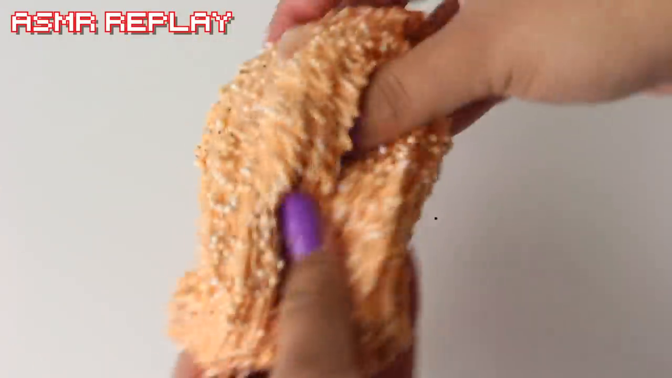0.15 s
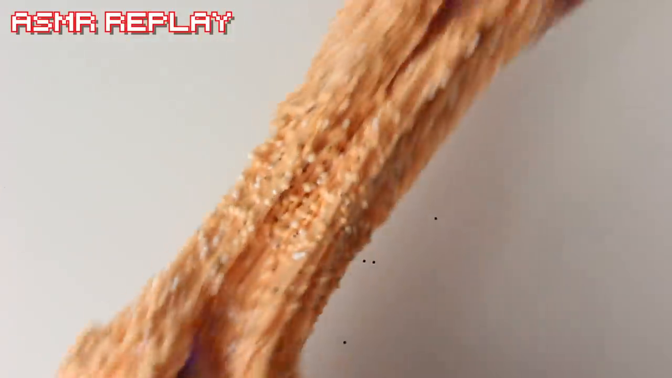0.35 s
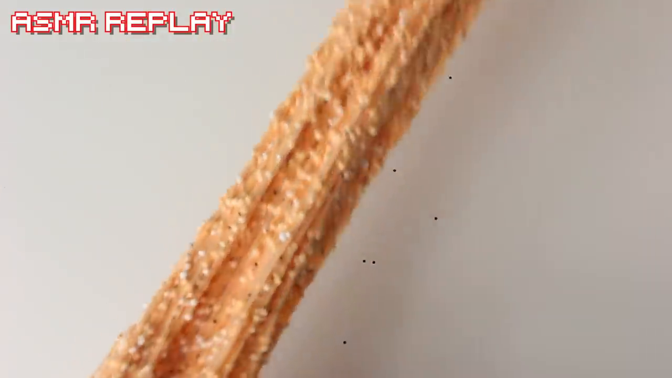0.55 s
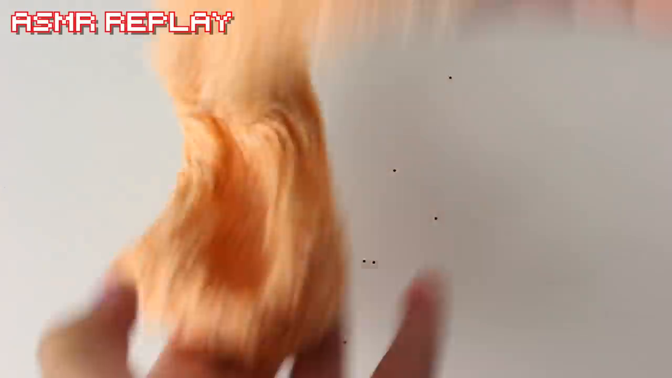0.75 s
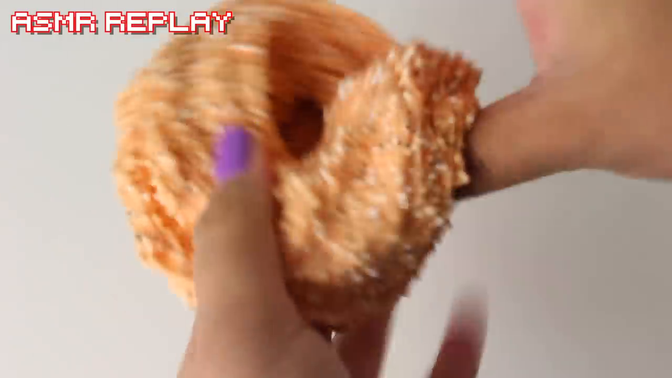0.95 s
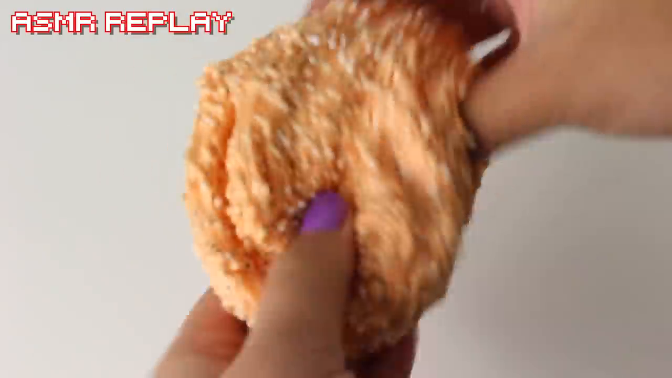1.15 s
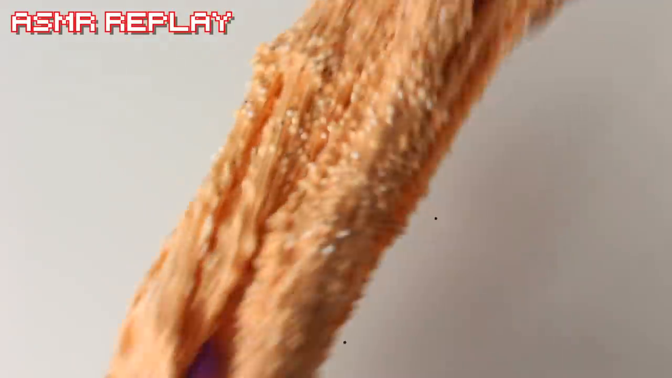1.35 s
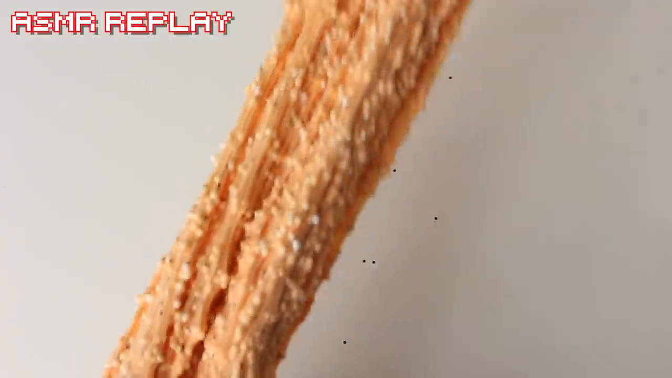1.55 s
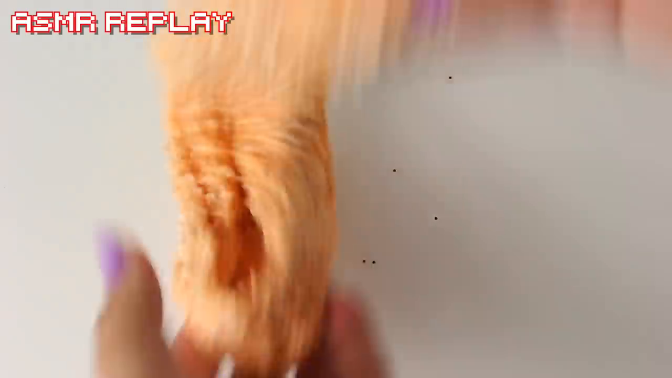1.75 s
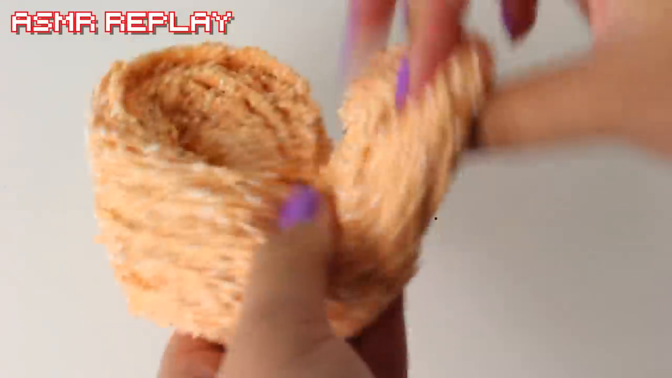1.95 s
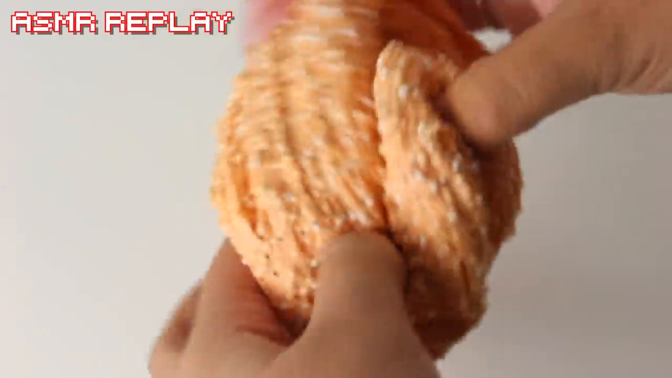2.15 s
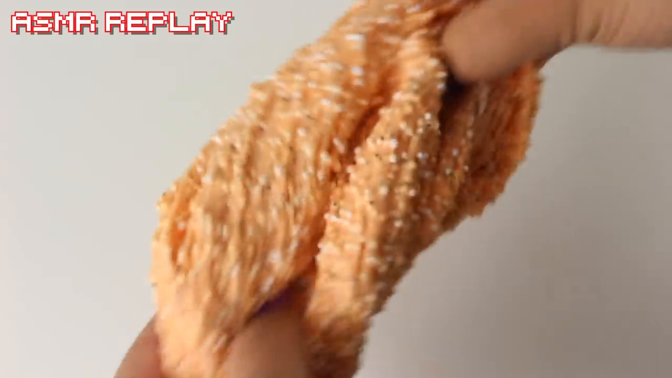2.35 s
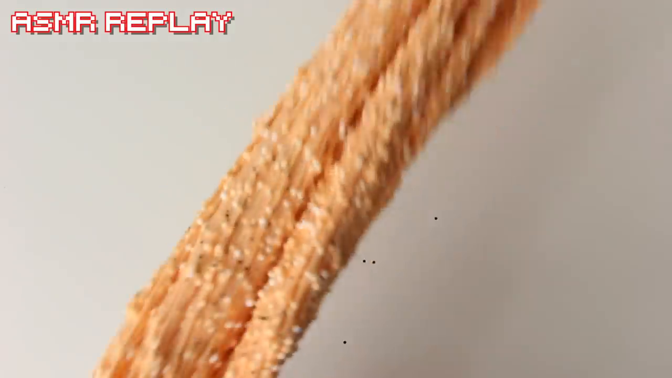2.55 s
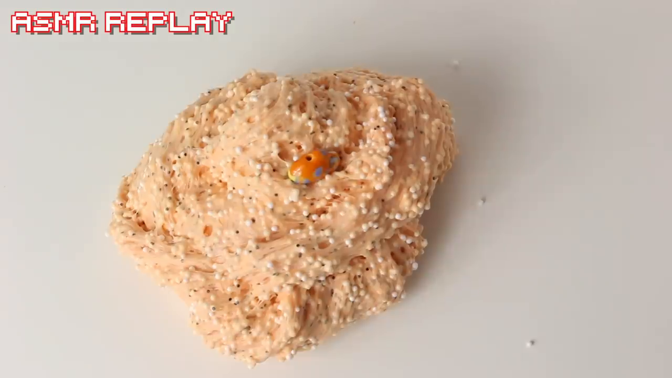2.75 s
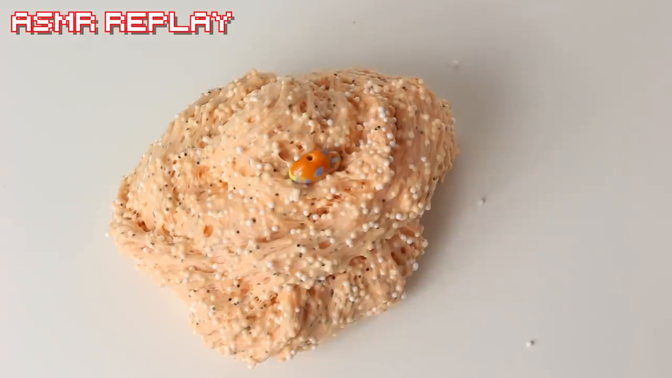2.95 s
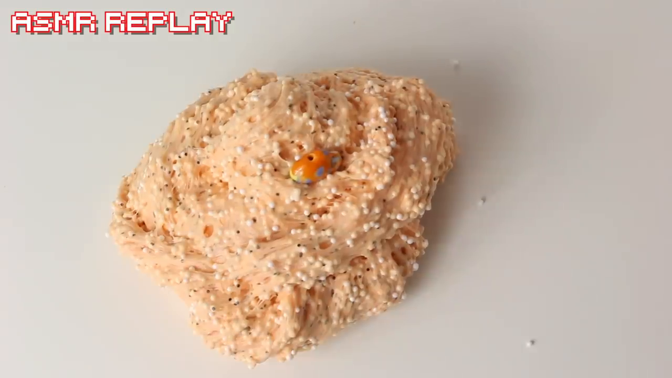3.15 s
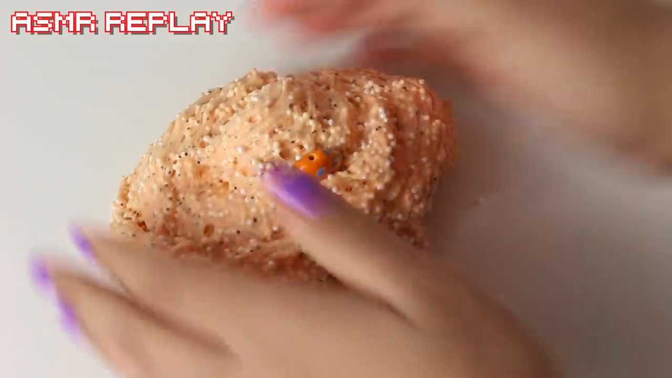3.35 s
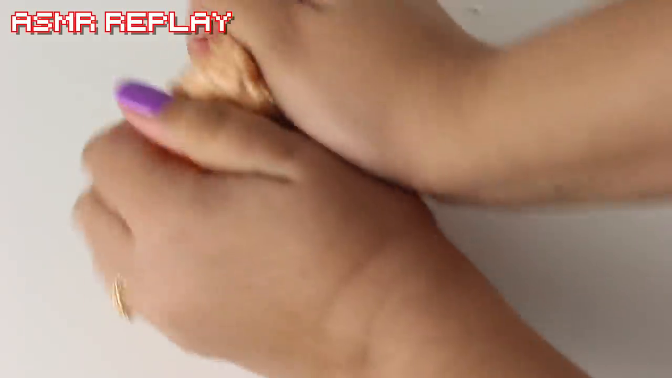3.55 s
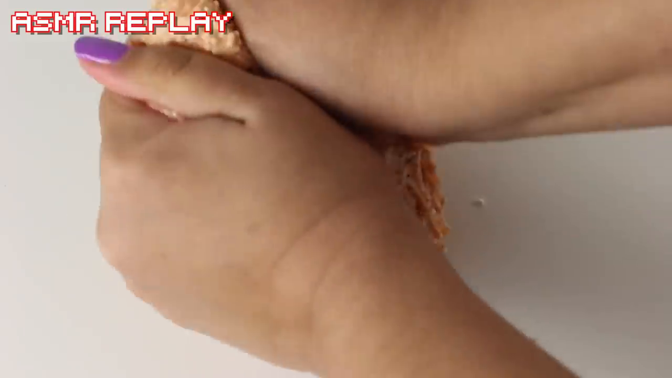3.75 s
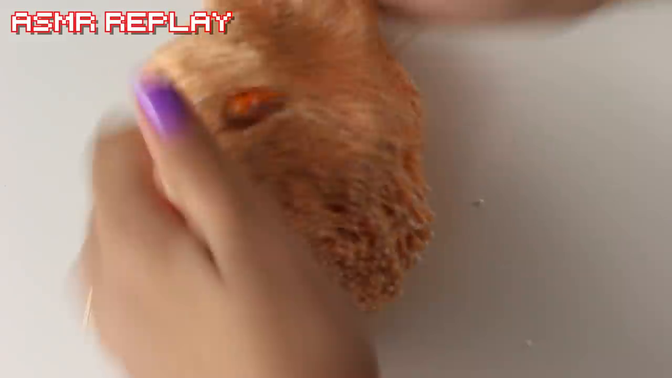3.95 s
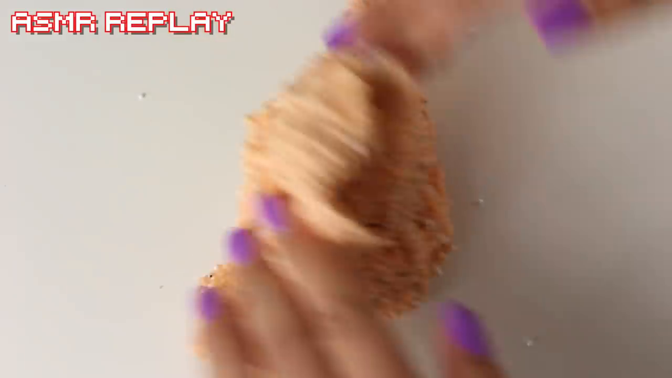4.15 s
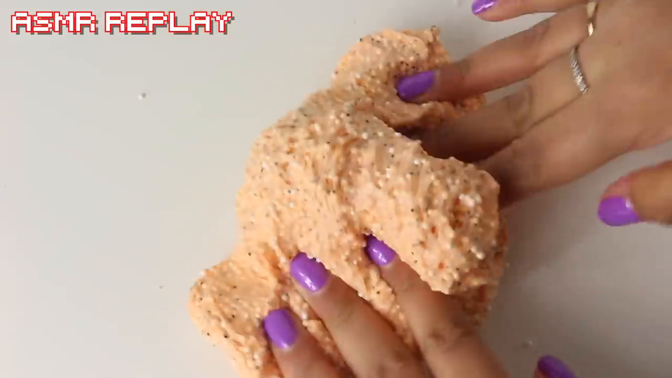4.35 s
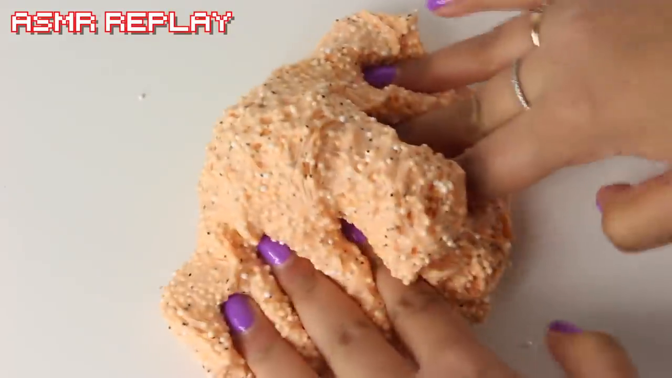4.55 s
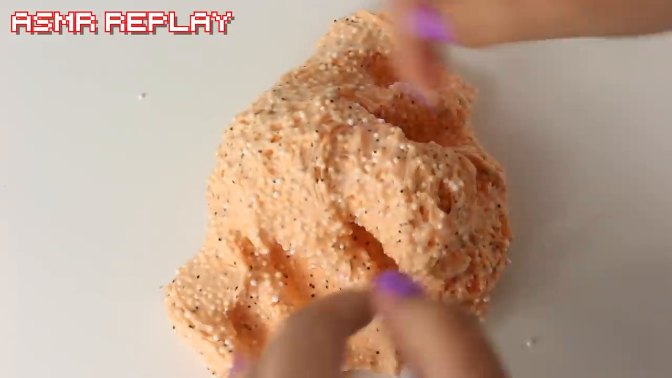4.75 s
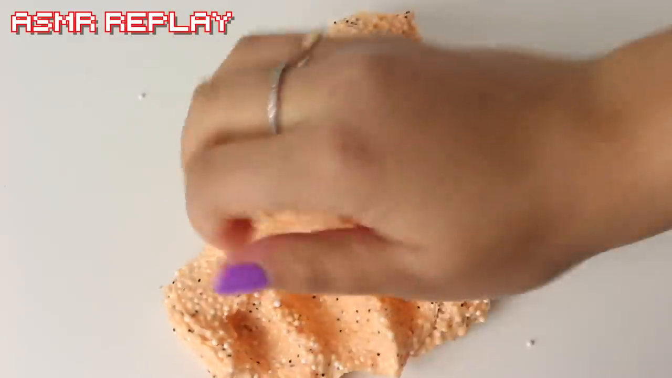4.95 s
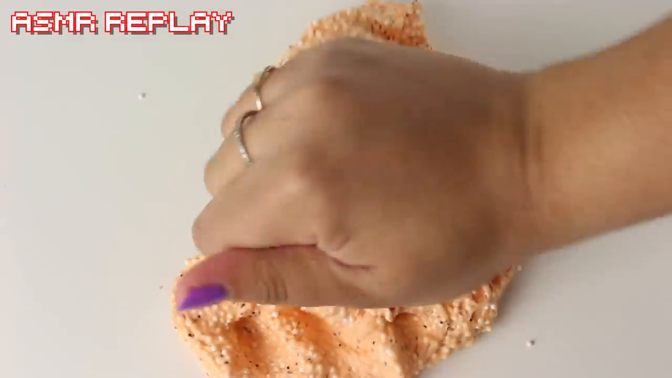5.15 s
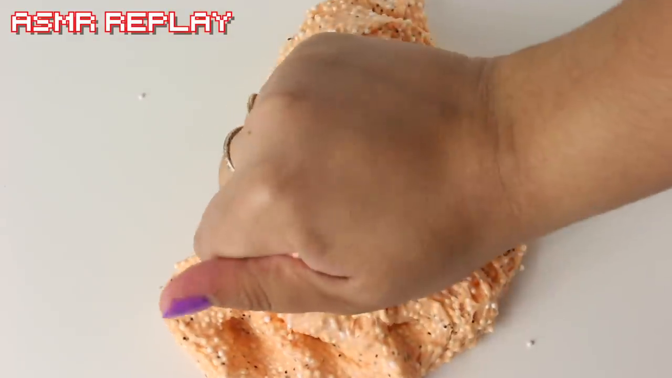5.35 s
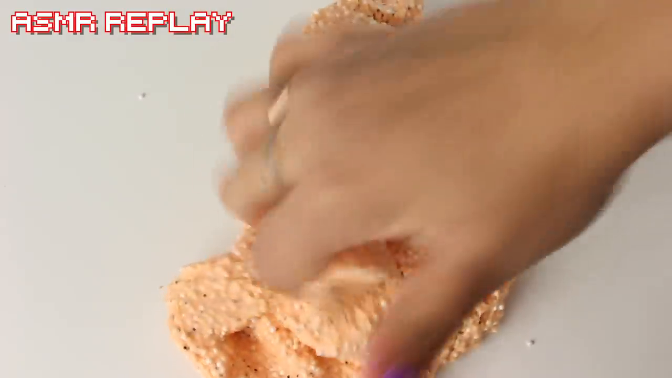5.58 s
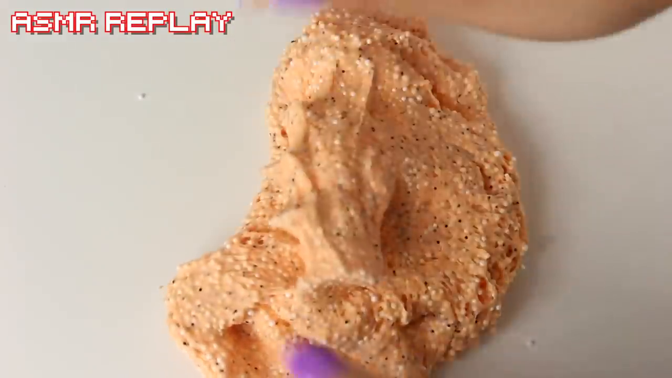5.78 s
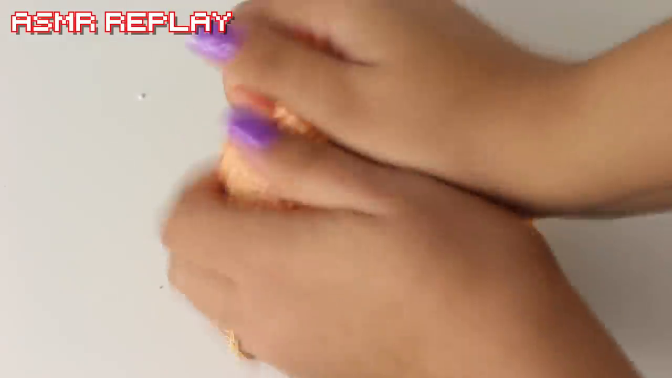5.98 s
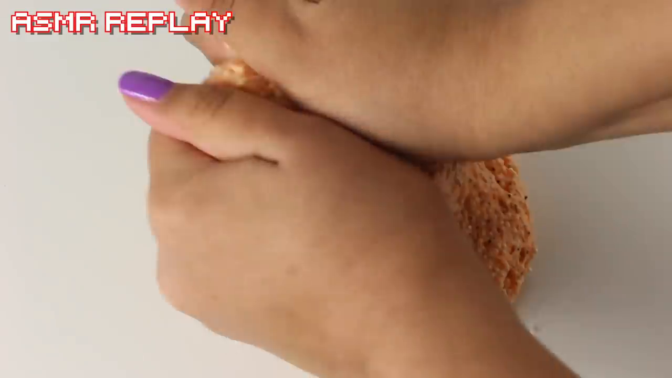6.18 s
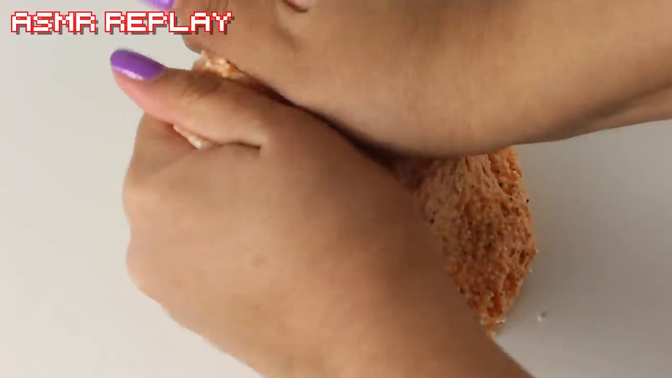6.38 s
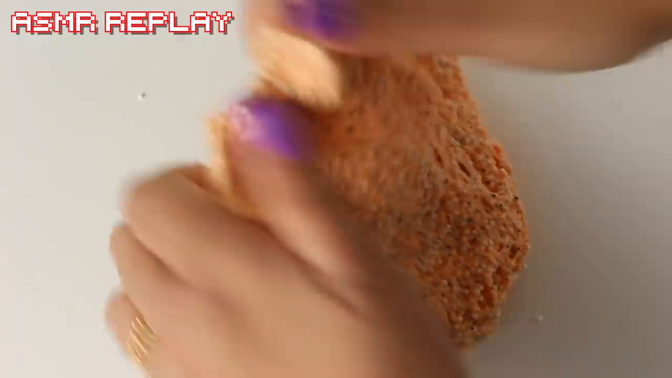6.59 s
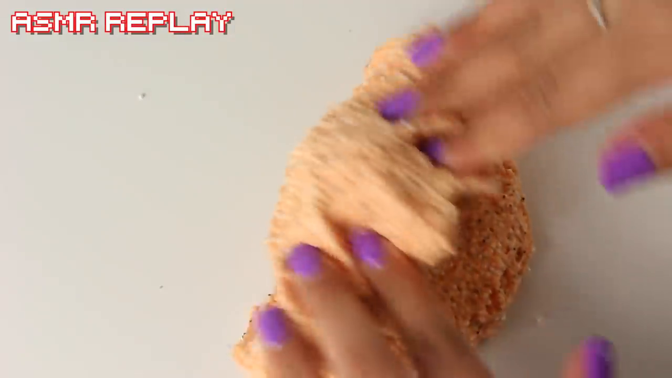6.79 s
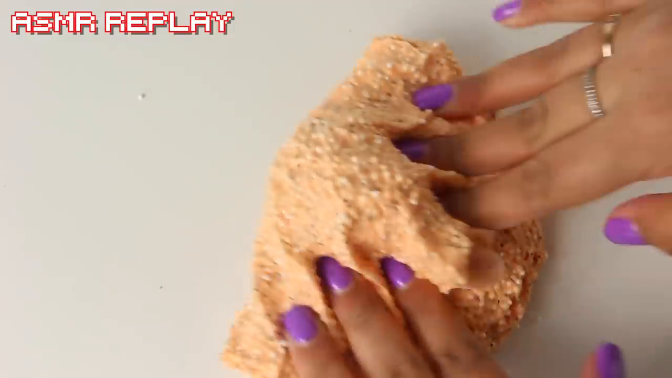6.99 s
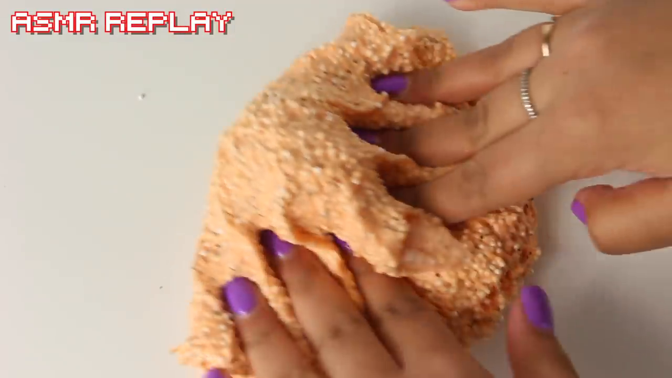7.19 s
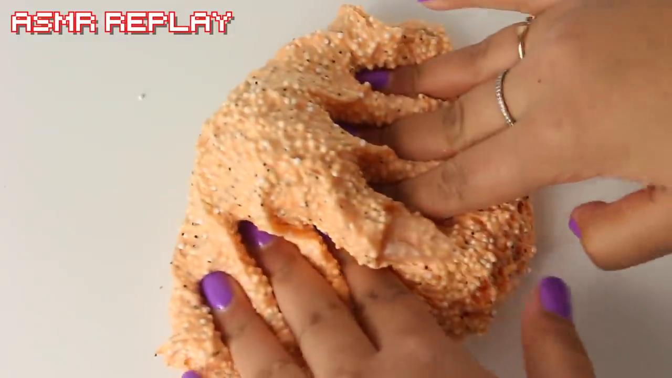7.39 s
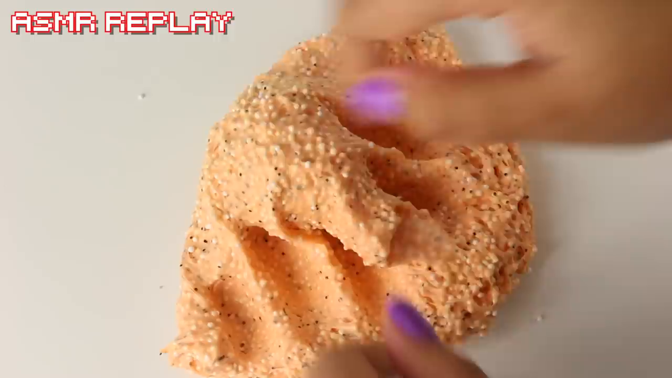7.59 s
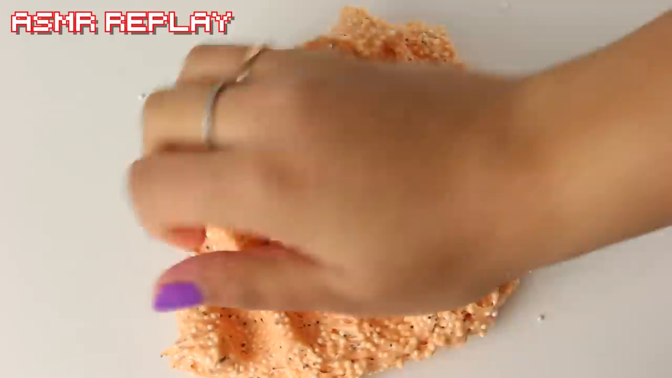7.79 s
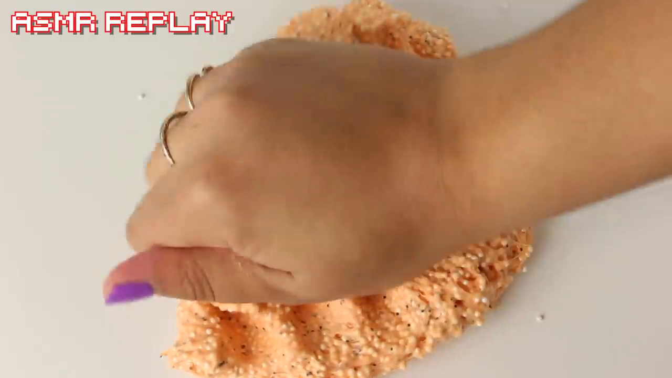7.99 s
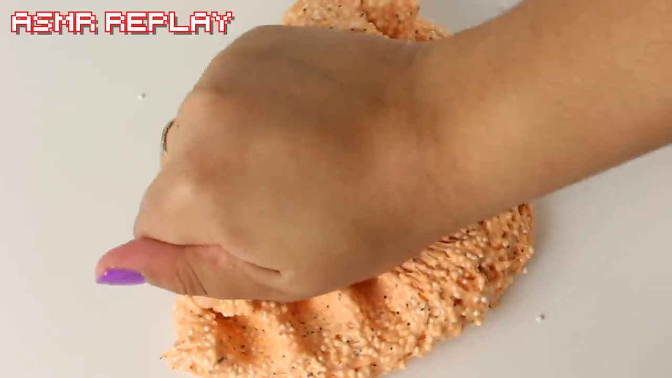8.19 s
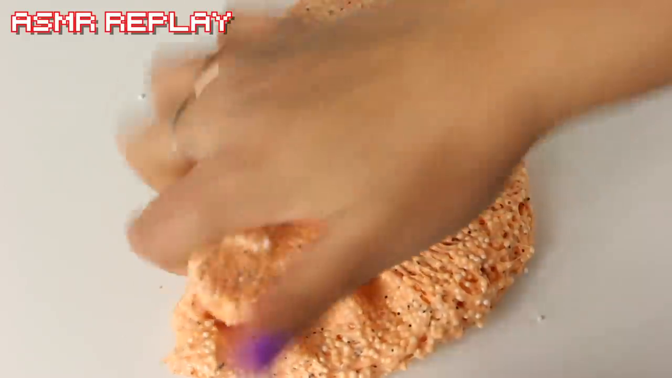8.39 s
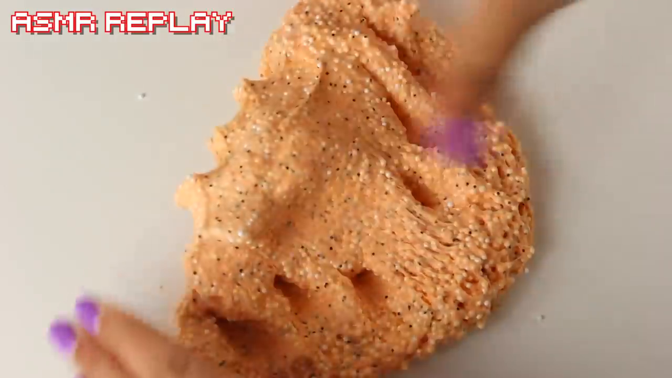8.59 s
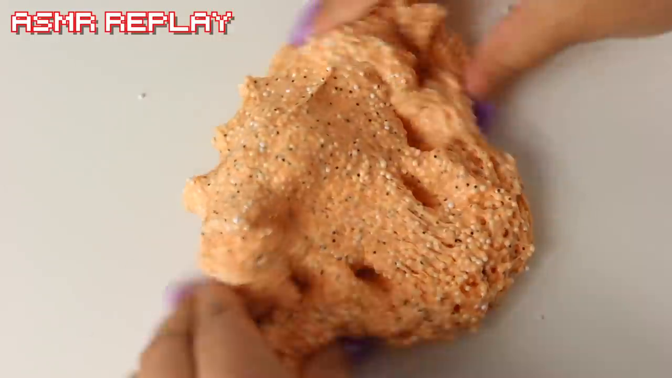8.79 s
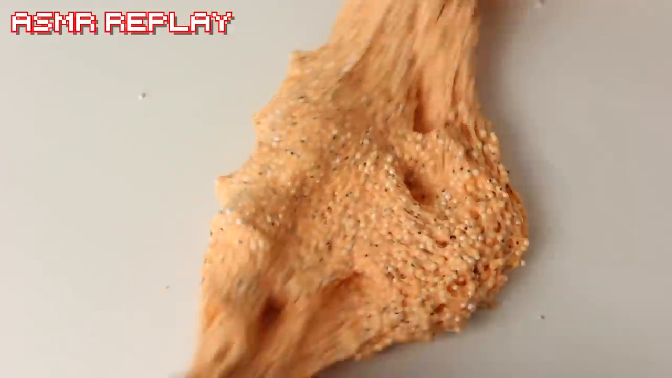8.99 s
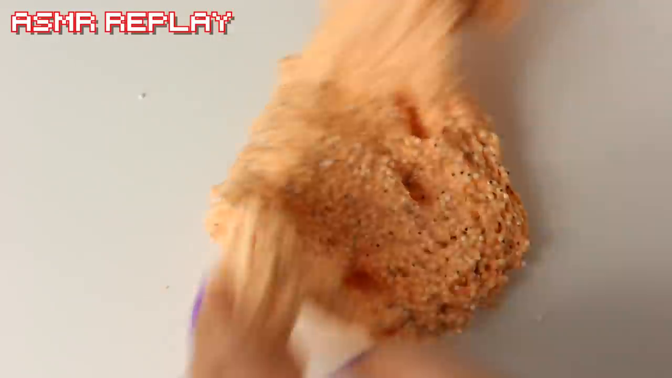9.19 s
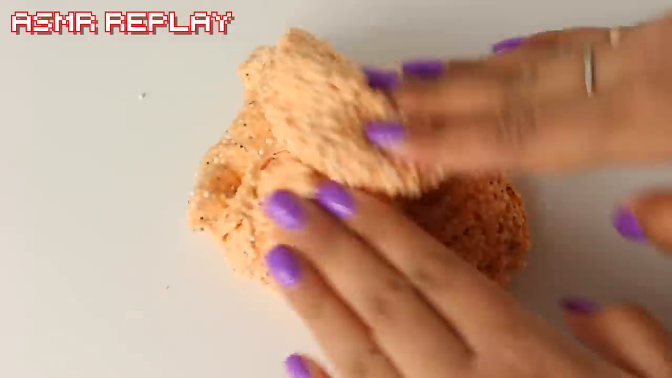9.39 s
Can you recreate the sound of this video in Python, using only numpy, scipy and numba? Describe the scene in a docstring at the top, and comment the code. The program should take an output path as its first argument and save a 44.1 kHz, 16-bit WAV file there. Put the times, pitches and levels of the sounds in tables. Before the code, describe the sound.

Close, crunchy crackle of beaded slime being pulled, then, after a short pause, pressed on a table in loud popping swells.

```python
"""A dense, wet crackle with loud pops: hands stretch, then squeeze a slime full of foam beads, close by.
The sound comes from air pockets bursting. A few large hollows plop, and one strand peels off with a buzz.
Pushes and slaps make the table top drum, and a finger ring ticks once. A small room echoes.
Behind it all lie a low rumble and hiss, which sink under loud crackle, and a far drone near the end.
The loudest pops clip."""
import sys
import numpy as np
from scipy import signal
from scipy.fft import rfft, irfft, next_fast_len
from scipy.io import wavfile
from scipy.ndimage import map_coordinates
from numba import njit

SR = 44100
rng = np.random.default_rng(int(sys.argv[2]) if len(sys.argv) > 2 else 0)


def file_out(sig):
    """Save sig as 16-bit WAV at sys.argv[1]."""
    # one column per channel
    cols = np.atleast_2d(sig).T
    # limit, then scale
    lim = np.clip(cols, -1, 1)
    pcm = np.round(lim * 32767).astype(np.int16)
    wavfile.write(sys.argv[1], SR, pcm)


N = 415855

# How strongly air pockets burst at each pitch. Each row: pitch in Hz, relative level in dB.
POCKET_STRENGTH = [(400, -8.5), (700, -8), (1100, -18.5), (2000, 0.5), (3600, 0), (6000, 2.5),
                   (10000, -4.5), (15000, -2)]


def crackle(clump_db, cycles, count=90000):
    """Thousands of small pockets burst each second; neighbours set each other off in clumps."""
    times = rng.uniform(0, N / SR, count)
    hz = 400 * 38 ** rng.uniform(0, 1, count)
    fine = np.clip(np.log2(hz / 4500), 0, 1)  # tiny pockets sound high
    large = np.clip(np.log2(2200 / hz), 0, 1)  # big ones sound low
    level_db, spread_db = kneading(times, fine, large)
    spread = np.clip(spread_db, 0, 6) * np.log(10) / 20
    clumps = unit(map_coordinates(rng.standard_normal(2000), [times * 160]))
    luck = clump_db / 3 * clumps + rng.standard_normal(count)
    scatter = np.exp(spread * luck - spread ** 2 * np.var(luck))  # uneven sizes, same average power
    size = amp(along(POCKET_STRENGTH, hz)) * rng.choice([-1, 1], count)
    size *= np.sqrt(hz / 3000)  # makes up for short swings carrying less energy
    life = cycles * np.exp(0.51 * rng.standard_normal(count))
    tenth = bursts(times[::10], hz[::10], life[::10], size[::10])
    full_level = np.sqrt(10 * np.mean(tenth ** 2))  # a tenth of the pockets tells the power of all
    return bursts(times, hz, life, size * scatter * amp(level_db) / full_level)


# Strokes of the hands. Each row: peak time, rise and fall in seconds, crackle level in dB, boost of
# fine pockets in dB, their delay in seconds, boost of large pockets in dB, spread of burst sizes in dB.
HAND_STROKES = [(.25, 0.11, 0.27, -41.5, -11, .002, 11.5, 3), (.45, 0.37, 0.26, -34.5, -0.5, .01, -7, 1.5),
                (0.665, 0.027, 0.15, -35, 5.5, 0.0012, -3, 4), (.845, 0.12, 0.064, -38.5, 2, .002, -1, 2.5),
                (.946, 0.076, 0.037, -44, 5, .002, 10, 3), (1.008, 0.045, 0.042, -39.5, 8.5, 0.0019, 7, 3),
                (1.08, 0.089, 0.066, -46, 1.5, .002, -10, 6), (1.2, 0.05, 0.21, -40.5, 5, .002, 11, 3),
                (1.45, 0.33, 0.21, -33.5, -1.5, .002, -11, 0.5),
                (1.668, 0.055, 0.19, -37.5, 6, 0.0018, 3, 3), (1.86, 0.044, 0.11, -42.5, 3, .01, 8, 2),
                (2.03, 0.2, 0.087, -40.5, 0.5, 0.0074, 6, 2.5),
                (2.15, 0.032, 0.034, -40.5, 3, .002, 3, 1.5), (2.203, 0.008, 0.037, -47, 3, .002, 18, 1.5),
                (2.29, 0.046, 0.23, -39.5, 3, .002, 10, 4), (2.52, 0.27, 0.45, -35.5, -2.5, .03, -14, 1),
                (3.48, 0.13, 0.2, -38.5, -2.5, .002, 5, 2.5), (3.635, .16, 0.1, -22, 5.5, 0.075, 0, 1.5),
                (3.8, 0.12, .08, -37, 9, .002, -8, 1), (4.038, 0.25, .13, -28, 1.5, 0.0019, 9, 1),
                (4.41, 0.26, 0.27, -30, -0.5, .03, 8.5, 3.5),
                (4.719, 0.064, 0.068, -28.5, 3, 0.0035, 15, 1),
                (5.101, 0.13, 0.32, -33.5, -3, 0.011, 10.5, 4.5),
                (5.235, 0.23, 0.06, -27.5, 7.5, 0.027, -9, 2.5), (5.38, 0.17, 0.16, -38, 16, .002, -12, 5),
                (5.64, .18, .11, -27.5, -4, 0.0022, 8.5, 1.5),
                (5.972, 0.068, 0.19, -24, -3.5, .002, 6, 0.5),
                (6.17, 0.12, 0.085, -24.5, 7.5, 0.071, 7, 1.5), (6.35, 0.26, 0.18, -42, 12, .02, -9, 3.5),
                (6.599, 0.16, .16, -28.5, -1.5, .002, 10, 1.5),
                (6.97, 0.23, 0.2, -37.5, -0.5, .002, 7.5, 4.5), (7.15, 0.05, 0.029, -41, -7, .002, 15, 3),
                (7.2, 0.28, 0.33, -41.5, 0, 0.051, 9.5, 3.5),
                (7.525, 0.059, 0.071, -28, 0.5, 0.0052, 14, 1.9),
                (7.9, 0.12, 0.13, -43.5, -12, .01, 18.5, 6), (8.03, 0.19, 0.13, -27.5, 5.5, .05, -1, 3.5),
                (8.2, 0.25, 0.22, -32.5, 3.5, .002, -16, 4.5),
                (8.421, 0.085, 0.1, -25.5, -4, 0.011, 10.5, 1), (8.85, 0.084, 0.13, -32, 3, 0.008, 7.5, 2),
                (9.0, 0.3, 0.18, -33.5, 2, .002, 10.5, 2), (9.189, 0.034, 0.1, -40, 8, 0.0018, 19, 3),
                (9.35, 0.25, 0.28, -44, 2, .002, 8.5, 3.5)]
ROUND_RISE, ROUND_FALL = 2.04, 1.47  # shape of a swell: 1 is pointed, 2 has a round top and a sudden end
FIZZ_DB = -60.5  # the lump keeps fizzing faintly between strokes


def kneading(times, fine, large):
    """The hands drive the bursts: gives their level and their spread of sizes, both in dB."""
    fine_db, delay, large_db, spread_db = np.transpose(HAND_STROKES)[4:, :, None]
    round_fall = ROUND_FALL + 1.02 * np.exp(-np.abs(spread_db))  # even strokes hold, then stop short
    stroke_db = swell(HAND_STROKES, times - fine * delay, round_fall)
    power = amp(2 * (stroke_db + fine * fine_db + large * large_db)) + 1e-30
    total = power.sum(axis=0)
    return 10 * np.log10(total + amp(2 * FIZZ_DB)), (power * spread_db).sum(axis=0) / total


# The loudest pops. Each row: start in seconds, pocket level in dB, pocket pitch in Hz,
# snap level in dB, body level in dB.
LOUD_POPS = [(.0365, -31, 2090, -34, -38), (.102, -27.5, 2250, -29, -38), (.2426, -19.5, 3750, -10.5, -25),
             (.3499, -23, 2980, -14.5, -26), (.3632, -11.5, 3140, -37, -36), (.3905, -26, 3520, -13, -37),
             (.4175, -18, 3850, -12, -26), (.5286, -20, 3680, -21, -47), (.5725, -22, 3460, -20, -45),
             (.61, -43, 3670, -21, -54), (.6666, -17.5, 3100, -30, -45), (.7552, -20.5, 2340, -13.5, -36),
             (.8562, -18.5, 3070, -24, -19), (.9584, -20, 3360, -19, -47), (1.0098, -13.5, 6000, -36, -26),
             (1.078, -33, 5420, -30, -53), (1.101, -40, 3160, -26, -30), (1.1447, -37, 4010, -19, -52),
             (1.1695, -25, 2890, -48, -43), (1.1914, -13, 2780, -32, -36), (1.203, -12, 2720, -8.5, -32),
             (1.2731, -18.5, 2060, -18, -35), (1.3008, -25, 1940, -16, -42), (1.3508, -24, 3440, -10, -40),
             (1.4035, -19, 3530, -15, -41), (1.4374, -15, 3180, -33, -37), (1.4713, -20, 3290, -14, -42),
             (1.536, -19, 4070, -12, -47), (1.6667, -26, 4070, -15, -44), (1.8722, -22, 3170, -22, -40),
             (1.9648, -35, 5090, -18.5, -49), (1.9955, -20, 2540, -26, -33), (2.0583, -25, 3260, -21, -19),
             (2.2042, -16, 1960, -27, -23), (2.2575, -14.5, 5360, -36, -36),
             (2.2867, -22.5, 2400, -33, -23), (2.2935, -13, 3760, -24, -15),
             (2.2981, -15.5, 3600, -29, -28), (2.3408, -21, 1780, -33, -19),
             (2.457, -18.5, 3710, -14.5, -37), (2.594, -18, 3100, -20, -47), (2.6393, -16, 2840, -18, -47),
             (3.4412, -12, 3970, -8, -47), (3.5318, -21, 3130, -22, -40), (3.575, -12, 2650, -27, -13),
             (3.5892, -7, 3250, -21, -18), (3.641, -2, 3840, -6, -30), (3.6618, -7, 3510, -7, -22),
             (3.6707, -3, 3600, -12, -12), (3.6866, -17, 4190, -3, -29), (3.6983, -21, 4230, -1, -32),
             (3.708, -13, 3480, -3, -30), (3.716, -14, 3220, 5, -38), (3.7276, -10, 4930, -8, -32),
             (3.7376, -9, 4770, 6.5, -46), (3.7681, -11, 2750, 1, -34), (3.7841, -9, 2580, 1.5, -17),
             (3.8026, -27, 4510, -14.5, -40), (3.8538, -30, 5780, 1, -42), (3.8656, -14.5, 2310, -20, -19),
             (3.9161, -25, 4140, -9, -38), (3.951, -12, 5300, -14, -33), (3.9611, -12.5, 2490, -26, -15),
             (4.0242, -14, 2960, -26, -17), (4.2684, -28, 2450, -38, -31), (4.3132, -7, 3500, -23, -16),
             (4.3353, -10.5, 3530, -13, -17), (4.359, -12, 3250, -12, -29), (4.3919, -6.5, 3200, -23, -14),
             (4.454, -31, 3070, -9, -31), (4.4758, -5, 3440, -2, -31), (4.494, -22, 2550, -13, -31),
             (4.5123, -18, 2550, -32, -29), (4.5744, -22.5, 3000, -31, -36),
             (4.6333, -20.5, 3170, -24, -44), (4.7163, -8, 4330, -28, -44), (5.0336, -17.5, 2950, -35, -11),
             (5.0967, -10, 2600, -25, -26), (5.1034, -3.5, 2900, -24, -31), (5.1131, -8, 2640, -19, -49),
             (5.1346, -8, 3520, -25, -15), (5.154, -7.5, 4000, -6, -24), (5.1814, -13, 5360, -10, -36),
             (5.2043, -24, 4410, 2, -33), (5.2122, -33, 4020, -13, -23), (5.2184, -9, 1750, -19, -8),
             (5.2265, -23, 2820, 3, -26), (5.2451, -3.5, 1880, -17, -1.5), (5.2586, -10, 3770, 1, -34),
             (5.2762, -23, 3960, -6.5, -36), (5.2917, -28, 3950, -14.5, -39), (5.3084, -24, 3340, -15, -40),
             (5.3165, -10, 2880, 1, -16), (5.3301, -10, 3830, 0, -36), (5.3464, -16, 3760, -3, -48),
             (5.3838, -31, 3570, -10, -45), (5.3952, -20, 3900, -6, -40), (5.4365, -6, 5360, 10, -22),
             (5.8805, -15, 1930, -31, -3.5), (5.923, -10, 2800, -13, -32), (5.97, -6, 2730, -32, -31),
             (6.0808, -8, 2850, -25, -32), (6.1113, -1, 4840, -2.5, -9), (6.1392, -4, 2980, -22, -24),
             (6.1586, -8, 3320, -3, -18), (6.1676, 0.5, 3580, -9, -17), (6.1753, -1, 3400, -11, -19),
             (6.1879, -7, 3920, -15, -27), (6.2237, -19, 5240, 0, -36), (6.2288, -0.5, 3940, -15, -24),
             (6.2403, -19, 2740, 7, -42), (6.2574, -22, 4020, -6, -37), (6.2672, -22, 3560, 6, -33),
             (6.2903, 0.7, 4540, -14, -36), (6.3085, -18, 4690, -4, -25), (6.3484, -24, 4200, -10, -36),
             (6.3735, -25, 4300, -6, -47), (6.3922, -16, 3830, -4.5, -45), (6.4375, -24, 3790, -14, -35),
             (6.79, -23.5, 3240, -20, -45), (6.8204, -14.5, 4500, -7.5, -41),
             (6.8663, -19.5, 3500, -28, -39), (6.9094, -28, 2330, -43, -22),
             (6.9375, -15.5, 3800, -16, -23), (6.9734, -7.5, 4610, -25, -16), (6.9908, -12, 2100, -19, -33),
             (7.0384, -20.5, 2770, -22, -40), (7.088, -30, 3340, -33, -49), (7.2341, -24, 3570, -26, -33),
             (7.3001, -15.5, 3310, -15, -37), (7.3076, -23, 2200, -38, -30),
             (7.3532, -24.5, 2250, -44, -22), (7.3877, -37, 4200, -26, -55), (7.404, -32, 3500, -30, -50),
             (7.4964, -12.5, 3450, -31, -31), (7.8676, -16.5, 1710, -42, -19),
             (7.9183, -19, 3370, -34, -17), (7.9253, -9, 3350, -33, -18), (7.94, -10, 2530, -36, -20),
             (7.9834, 3, 4070, -17, 0), (7.9889, 1, 3900, -13, -26), (8.0159, -15, 3660, -15, -27),
             (8.0208, -1, 2750, -28, -2.5), (8.0555, -15, 2100, -26, -12), (8.0632, 1.5, 3440, -17, 4),
             (8.0823, -27, 2120, 0, -26), (8.087, -8.5, 1940, -6, -16), (8.098, -4.5, 3330, 4, -34),
             (8.1157, -8.5, 3440, -25, -28), (8.1295, -8.5, 2600, -30, -22), (8.1645, -20, 3910, -4, -35),
             (8.1853, -10, 2520, -20, -8.5), (8.2338, -26, 3660, -10, -43), (8.2588, -16.5, 3980, -11, -47),
             (8.3019, -39, 3110, -17, -49), (8.336, -9, 3460, -12, -42), (8.4125, -8, 1780, -29, -31),
             (8.6952, -27, 2190, -45, -19), (8.8456, -16, 3630, -22, -29), (8.898, -16, 3600, -15, -33),
             (8.9191, -6.5, 5930, -10, -36), (8.968, -12.5, 4360, -8, -18), (8.983, -9, 4300, -23, -36),
             (9.0635, -15, 3300, -27, -28), (9.1852, -21, 2500, -17, -27), (9.2953, -23, 3610, -20.5, -53),
             (9.3483, -21, 2920, -38, -65), (9.396, -22.5, 2680, -42, -35)]


def pops(cycles, snap_cycles, body_cycles, fray_db, fray_s):
    """A pocket rings with a bright snap and a dull body; its skin then frays into smaller bursts."""
    rows = np.vstack([LOUD_POPS, stray_pops(count=300)])
    times, db, hz, snap_db, body_db = rows.T
    luck = rng.standard_normal((len(times), 3))
    snap_hz = 10000 * np.exp(.2 * luck[:, 1])
    body_hz = 1050 * np.exp(.2 * luck[:, 2])
    out = bursts(times, hz, cycles, amp(db) * np.sign(luck[:, 0]))
    out += bursts(times, snap_hz, snap_cycles, amp(snap_db))
    out += bursts(times, body_hz, body_cycles, amp(body_db))
    for pitch, pop_db in (hz, db), (snap_hz, snap_db):
        late = rng.exponential(1, (len(times), 16))
        fray_hz = pitch[:, None] * np.exp(0.37 * rng.standard_normal(late.shape))
        fray_times = np.minimum(times[:, None] + fray_s * late, N / SR)
        fray_gain = amp(pop_db[:, None] + fray_db - 18.8 * late)  # later bursts are quieter
        out += bursts(fray_times.ravel(), fray_hz.ravel(), cycles, fray_gain.ravel())
    return out


def stray_pops(count):
    """Rows like LOUD_POPS for smaller pops at chance moments; uneven strokes pop louder."""
    times = rng.uniform(0, N / SR, count)
    luck = rng.standard_normal((count, 4))
    _, spread_db = kneading(times, 0, 0)
    boost_db = 9 + 0.89 * spread_db - 3.5 * np.abs(luck[:, 0])
    level = lambda fine, large: kneading(times, fine, large)[0] + boost_db
    hz = 3260 * np.exp(0.23 * luck[:, 1])
    snap_db = level(0.83, 0.66) - 11 + 5 * luck[:, 2]
    body_db = level(0.16, 0.12) - 11.5 + 4 * luck[:, 3]
    return np.transpose([times, level(0, 0.034), hz, snap_db, body_db])


# Large hollows in the slime. Each row: start in seconds, level in dB, pitch in Hz.
HOLLOWS = [(1.188, -24, 600), (4.028, -15, 690), (4.516, -19.5, 418), (7.144, -20.5, 590),
           (9.19, -19.5, 655)]


def plops(cycles):
    """A hollow sucks open and swings a few times at its low pitch."""
    times, db, hz = np.transpose(HOLLOWS)
    return bursts(times, hz, cycles, amp(db))


# A strand peeling off. Each row: time in seconds, slips per second, level in dB.
STRAND_SLIPS = [(1.59, 480, -27), (1.603, 520, -26), (1.612, 630, -26), (1.625, 520, -29),
                (1.648, 600, -29)]


def peel(low_hz, high_hz, high_db):
    """A strand lets go in quick, even slips; their two-pitched ticks blur into a buzz."""
    t = np.arange(round(STRAND_SLIPS[0][0] * SR), round(STRAND_SLIPS[-1][0] * SR)) / SR
    rate, db = curves(STRAND_SLIPS, t)
    slips_so_far = np.floor(np.cumsum(np.abs(rate)) / SR)
    slips = np.flatnonzero(np.diff(slips_so_far, prepend=-1))
    size = amp(db[slips] + 0.92 * rng.standard_normal(200)[:len(slips)])
    return bursts(t[slips], low_hz, 0.27, size) + bursts(t[slips], high_hz, 0.61, size * amp(high_db))


# The lump or a hand lands on the table. Each row: start in seconds, level in dB,
# boost of the table's higher tones in dB per octave.
TABLE_SLAPS = [(1.796, -20.5, 1), (3.458, -23.5, -17), (5.879, -5.5, 1.5), (8.696, -23.5, -5)]


def splat(db, fade_s):
    """The wet face of the lump smacks the table with a puff of noise at every slap."""
    out, t = np.zeros(N + SR), np.arange(SR // 5) / SR
    for start, slap_db, _ in TABLE_SLAPS:
        fade = amp(slap_db + db - 60 * t / fade_s)
        out[round(start * SR):][:len(t)] += fade * rng.standard_normal(len(t))
    return filtered(out[:N], lambda hz: 3000 / (3000 + 1j * hz))


# The table top's own tones. Each row: pitch in Hz, relative level in dB, seconds to fade by 60 dB.
TABLE_TONES = [(84, -13, 0.15), (147, -1, 0.15), (232.4, -3, 0.085), (330, -2, 0.076), (424, -8, 0.058),
               (593, -1, 0.033), (862, -20, 0.068)]


def table(soft_hz):
    """Slaps ring the table top; the soft, rough push of the lump drives its lower tones."""
    def top(hz):
        tones = sum((-1) ** k * amp(db) * resonance(hz, pitch, np.log(1000) / (np.pi * fade_s))
                    for k, (pitch, db, fade_s) in enumerate(TABLE_TONES))
        return tones / (1 + (hz / soft_hz) ** 2)
    rubbing = unit(filtered(rng.standard_normal(N), top))
    motion = pushing() * rubbing + struck(TABLE_SLAPS, TABLE_TONES, attack_s=0.0035)
    return filtered(motion, lambda hz: bass_cut(hz, 60) ** 2)  # a thin top gives off no deep bass


# The lump is pushed or dragged on the table. Each row: peak time, rise and fall in seconds, level in dB.
LUMP_PUSHES = [(3.47, 0.1, .08, -48), (3.59, 0.11, 0.16, -37), (4.02, 0.12, 0.23, -35),
               (4.34, 0.12, .15, -49.5), (4.53, 0.084, 0.035, -39.5), (4.715, .04, 0.066, -27.5),
               (4.79, 0.051, 0.067, -40), (5.24, .25, 0.07, -43.5), (5.63, 0.12, 0.13, -28),
               (5.9, 0.016, .09, -22.5), (6.05, 0.21, 0.13, -36.5), (6.62, 0.17, 0.21, -46),
               (6.97, 0.11, 0.13, -51), (7.31, .25, .08, -55), (7.53, 0.048, 0.085, -29.5),
               (7.88, 0.071, 0.14, -43), (8.07, 0.027, .25, -47), (8.42, 0.087, .1, -32.5),
               (8.72, 0.075, .15, -43), (8.96, 0.21, 0.22, -44.5), (9.21, .07, .06, -46)]


def pushing():
    """How hard all the pushes drive the table, as a gain for every sample."""
    t = np.arange(0, N + 64, 64) / SR
    power = amp(2 * swell(LUMP_PUSHES, t, ROUND_FALL)).sum(axis=0)
    return np.interp(np.arange(N) / SR, t, np.sqrt(power))


# The shaking table frame. Each row: pitch in Hz, relative level in dB.
FRAME_COLOUR = [(20, -29), (45, -11), (80, -3), (140, -6.5), (190, -8.5), (300, -27)]


def shudder(db, linger_s):
    """Each push leaves the table frame shaking for a moment."""
    return amp(db) * lingering(pushing(), linger_s) * noise(FRAME_COLOUR)


# The ring's tap. Each row: start in seconds, level in dB, boost of higher tones in dB per octave.
RING_TAPS = [(4.8204, -32, -2)]
# The ring's own tones. Each row: pitch in Hz, relative level in dB, seconds to fade by 60 dB.
RING_TONES = [(3850, -8, .02), (5700, -12, .06), (6390, 2, .025), (7030, -8, .08), (9800, -8, .02),
              (10430, 1, .05), (10770, 3, .03), (13900, -12, .06)]


def ring_tick():
    """A finger ring touches something hard and rings briefly."""
    return struck(RING_TAPS, RING_TONES, attack_s=0.00027)


# The small room's echo. Each row: pitch in Hz, seconds to fade by 60 dB.
ECHO_FADES = [(300, 0.056), (2000, .12), (12000, 0.07)]


def room(sound):
    """The walls echo, each pitch fading at its own speed."""
    hop = SR // 16  # the echo varies every sixteenth of a second, so it has no fixed ring
    out = np.zeros(N + SR)
    hz, t, spectra = signal.stft(rng.standard_normal((12, SR // 5)), SR, nperseg=128)
    fade = amp(-60 * t / along(ECHO_FADES, hz)[:, None])
    _, tails = signal.istft(spectra * fade, SR, nperseg=128)
    for k, start in enumerate(range(0, N, hop)):
        tail = tails[k % len(tails)]
        echo = signal.fftconvolve(sound[start:start + hop], tail / np.linalg.norm(tail))
        out[start + 40:][:len(echo)] += echo
    return out[:N]


# The rumble of the house, and the hiss. Each row: pitch in Hz, relative level in dB.
RUMBLE_COLOUR = [(15, -19), (30, -20), (50, -8.5), (75, -6), (95, -7.5), (120, 0.5), (190, -11),
                 (300, -8.5), (600, -68)]
HISS_COLOUR = [(100, -36), (200, 10.5), (400, 0.5), (800, 0), (1600, -4.5), (3500, -9), (7000, -9),
               (15800, -11.5), (17000, -31)]


def rumble_and_hiss(near, rumble_db, hiss_db, sink_from_db, return_s):
    """Steady noise that sinks when the nearby treble gets loud, then comes back."""
    treble = filtered(near, lambda hz: bass_cut(hz, 5000))
    treble_db = 10 * np.log10(lingering(treble ** 2, return_s) + 1e-12)
    sink = amp(-0.96 * np.maximum(treble_db - sink_from_db, 0))
    return sink * (amp(rumble_db) * noise(RUMBLE_COLOUR) + amp(hiss_db) * noise(HISS_COLOUR))


# How the drone comes and goes. Each row: time in seconds, level in dB.
DRONE_LEVELS = [(8.55, -49), (8.606, -51), (8.632, -71), (8.72, -43), (8.804, -43), (8.974, -52.5),
                (9.03, -43), (9.094, -44), (9.128, -60), (9.22, -55), (9.266, -44), (9.43, -57)]
# The drone's deep tone. Each row: pitch in Hz, relative level in dB.
DRONE_COLOUR = [(40, -48), (65, -25), (80, 0), (95, -14), (140, -39.5)]


def drone():
    """A low, wavering drone comes up from afar."""
    db, = curves(DRONE_LEVELS, np.arange(N) / SR)
    return amp(db) * noise(DRONE_COLOUR)


# The hiss that differs between left and right. Each row: pitch in Hz, relative level in dB.
SIDE_HISS_COLOUR = [(12, -30), (20, 4), (27, 10), (150, 4), (210, 9), (718, -5.5), (14700, -13.5),
                    (16000, -12)]


def side_hiss(db):
    """A faint, steady hiss that differs between left and right."""
    return amp(db) * noise(SIDE_HISS_COLOUR)


def bursts(times, hz, cycles, gain):
    """One short, fading swing per burst; it is strongest after the given number of cycles."""
    out = np.zeros(N)
    step = 2 * np.pi * np.clip(hz, 100, 18000) / SR * np.ones(len(times))
    cycles = np.clip(cycles, .1, 9) * np.ones(len(times))
    add_swings(out, (times * SR).astype(np.int64), step, cycles, gain)
    return out


@njit
def add_swings(out, start, step, cycles, gain):
    """Adds sine waves that swell and die away; step is in radians per sample."""
    for i in range(len(start)):
        rise = cycles[i] * 2 * np.pi / step[i]
        for k in range(min(int(7 * rise) + 2, len(out) - start[i])):
            age = (k + 1) / rise
            out[start[i] + k] += gain[i] * age * np.exp(1 - age) * np.sin(step[i] * (k + .5))


def struck(blows, tones, attack_s):
    """Every blow rings an object's tones at slightly different strengths."""
    out, t = np.zeros(N + SR), np.arange(SR // 2) / SR
    for start, db, tilt_db in blows:
        ring = np.zeros(len(t))
        for hz, tone_db, fade_s in tones:
            start_db = tone_db + tilt_db * np.log2(np.hypot(1, hz / 180)) + rng.normal(0, 2)
            ring += amp(start_db - 60 * t / fade_s) * np.sin(2 * np.pi * hz * t)
        ring *= 1 - np.exp(-t / attack_s)
        out[round(start * SR):][:len(t)] += amp(db) * ring / np.abs(ring).max()
    return out[:N]


def swell(rows, times, round_fall, edge_db=24):
    """Each row's level in dB: edge_db down one rise before its peak and one fall after it."""
    peak, rise, fall, db = np.transpose(rows)[:4, :, None]
    before = np.abs((peak - times) / rise) ** ROUND_RISE
    after = np.abs((times - peak) / fall) ** round_fall
    return db - edge_db * np.where(times < peak, before, after)


def noise(colour):
    """Steady noise of average power 1 with the given colour."""
    return unit(filtered(rng.standard_normal(N), lambda hz: amp(along(colour, hz))))


def lingering(x, seconds):
    """Follows x smoothly, with a fading memory."""
    keep = np.exp(-1 / (seconds * SR))
    return signal.lfilter([1 - keep], [1, -keep], x)


def filtered(x, response):
    """Scales and shifts each frequency of x by response(hz)."""
    size = next_fast_len(N + SR // 2)
    return irfft(rfft(x, size) * response(np.fft.rfftfreq(size, 1 / SR)), size)[..., :N]


def bass_cut(hz, corner_hz):
    """A response that weakens pitches below the corner."""
    return 1j * hz / (corner_hz + 1j * hz)


def resonance(hz, pitch, width):
    """A response that favours one pitch."""
    return 1j * hz * width / (pitch ** 2 - hz ** 2 + 1j * hz * width)


def along(points, hz):
    """Reads between (Hz, value) points, spaced by octaves."""
    pitches, values = np.transpose(points)
    return np.interp(np.log(hz + 1), np.log(pitches + 1), values)


def curves(rows, times):
    """Reads each column after the first at these times; -120 outside the rows."""
    row_times, *columns = np.transpose(rows)
    return [np.interp(times, row_times, column, left=-120, right=-120) for column in columns]


def amp(db):
    """Turns dB into gain."""
    return 10 ** (np.asarray(db) / 20)


def unit(x):
    """Scales x to average power 1."""
    return x / np.sqrt(np.mean(x ** 2) + 1e-20)


def scene():
    """One microphone feeds both channels; only a faint hiss differs between them."""
    slime = crackle(clump_db=4.0, cycles=0.24)
    slime += pops(cycles=0.39, snap_cycles=0.44, body_cycles=0.15, fray_db=-7, fray_s=.004)
    slime += plops(cycles=0.95)
    slime += splat(db=-13, fade_s=0.16)
    slime += peel(low_hz=3600, high_hz=6700, high_db=-2.5)
    # Small pockets give off little bass; some reaches the close microphone as a puff of air.
    slime = filtered(slime, lambda hz: bass_cut(hz, 350) ** 3 + amp(-24.5) * 350 / (350 + 1j * hz))
    near = slime + ring_tick()
    near += amp(-6.5) * room(near)
    near[round(2.685 * SR):round(3.2 * SR)] = 0  # the near sound falls silent from 2.685 s to 3.2 s, echoes included
    mix = near + table(soft_hz=213)
    mix += rumble_and_hiss(near, rumble_db=-57, hiss_db=-55.5, sink_from_db=-30.5, return_s=0.05)
    mix += shudder(db=-13, linger_s=0.061)
    mix += drone()
    side = side_hiss(db=-75.5)
    return np.array([mix + side, mix - side])


# A narrow and a broad lift in the upper middle pitches.
# Each row: pitch in Hz, width in Hz, level of the added part in dB.
PITCH_LIFTS = [(1630, 56, -5.5), (3550, 740, -5.5)]


def record(dry, top_hz=15900):
    """The microphone lifts the upper middle pitches, loud peaks clip, and the highest treble is cut."""
    lift = lambda hz: 1 + sum(amp(db) * resonance(hz, pitch, width) for pitch, width, db in PITCH_LIFTS)
    heard = filtered(dry, lift)
    clipped = heard / (1 + np.abs(heard / .97) ** 8) ** (1 / 8)
    return filtered(clipped, lambda hz: hz < top_hz)


dry = scene()
out = record(dry)
file_out(out)
```